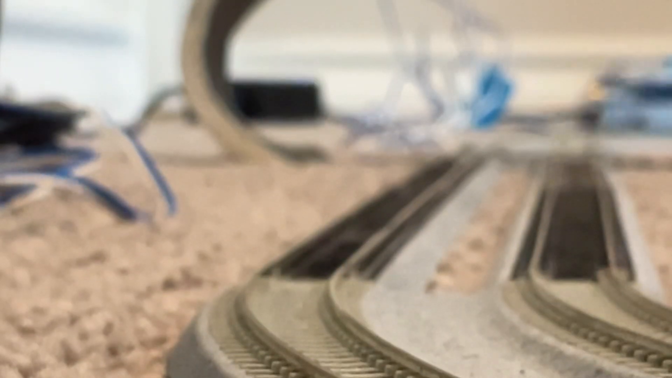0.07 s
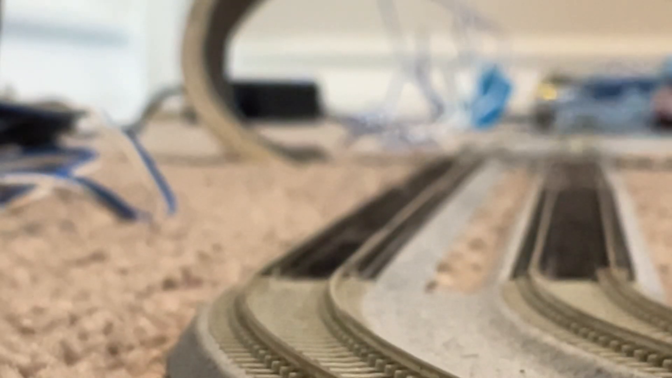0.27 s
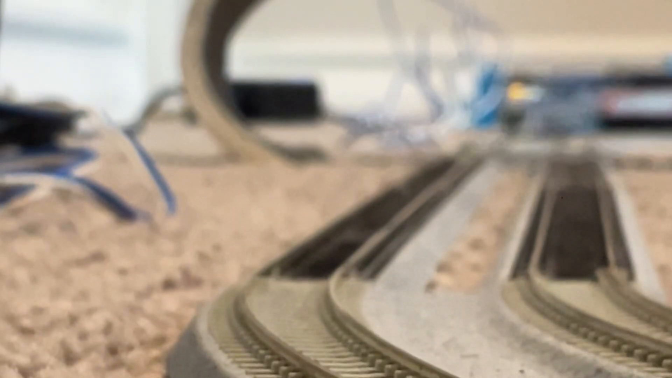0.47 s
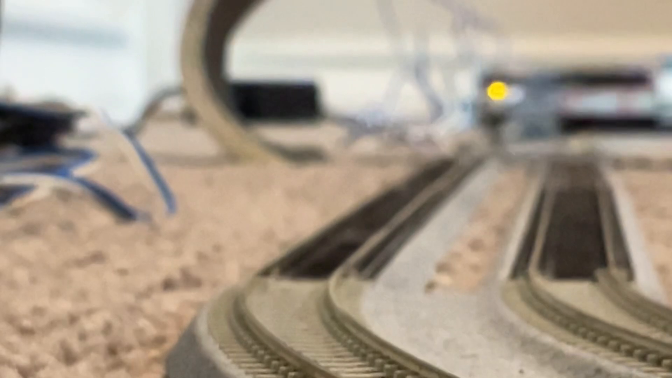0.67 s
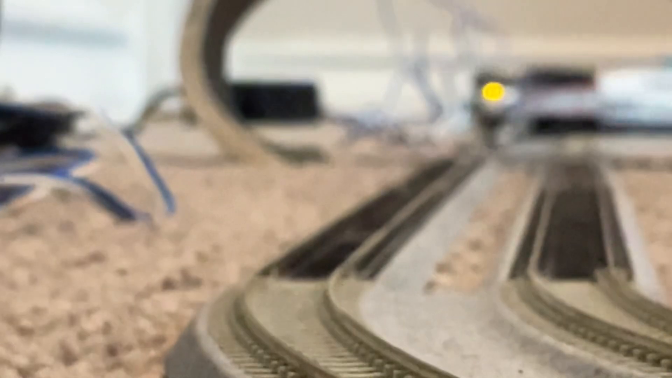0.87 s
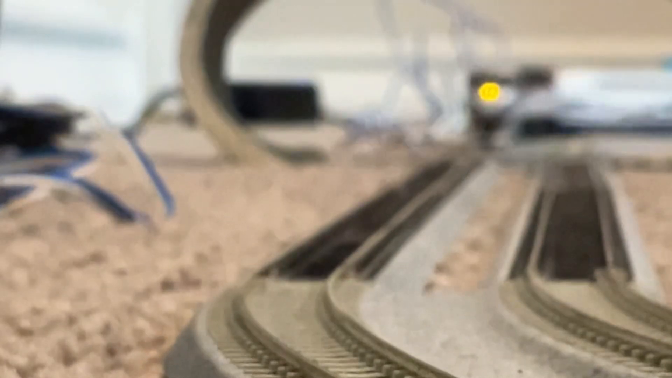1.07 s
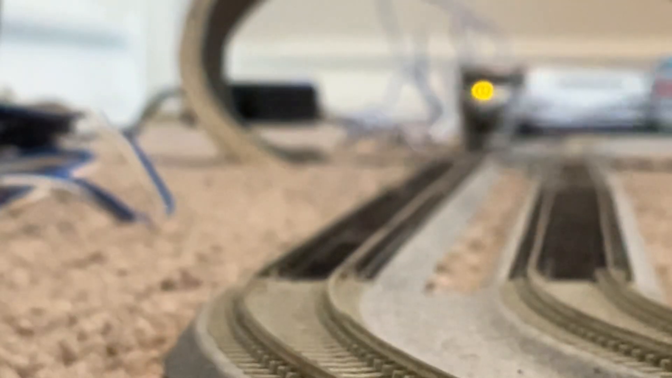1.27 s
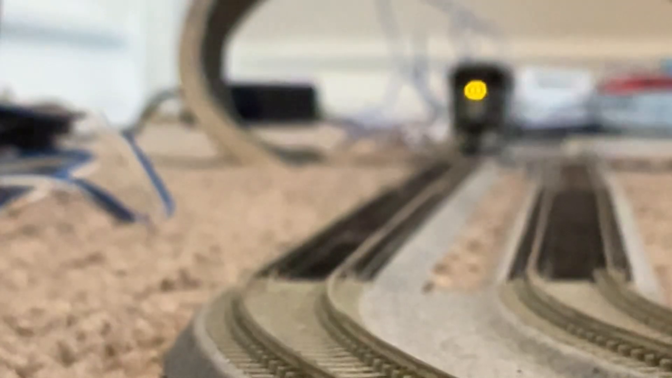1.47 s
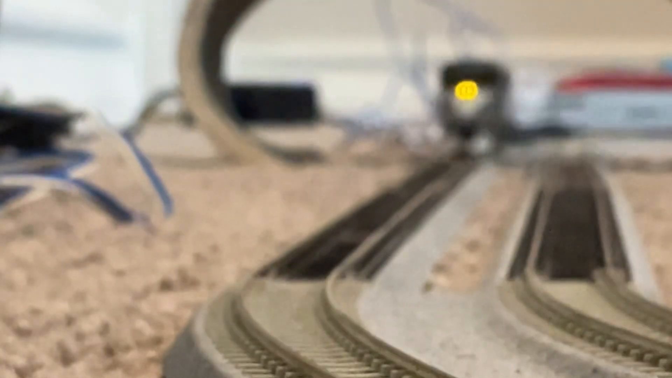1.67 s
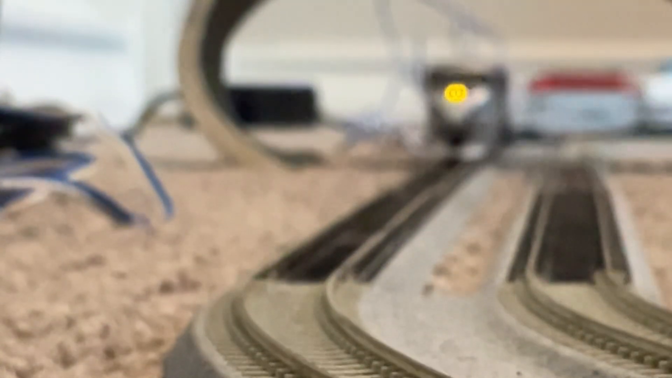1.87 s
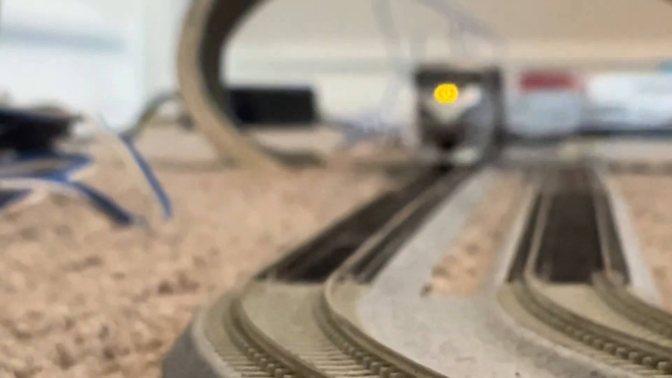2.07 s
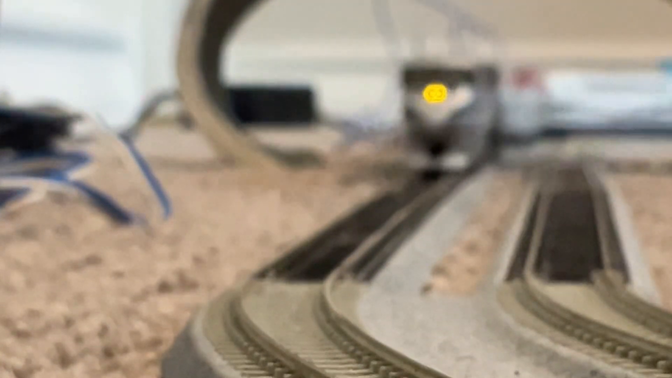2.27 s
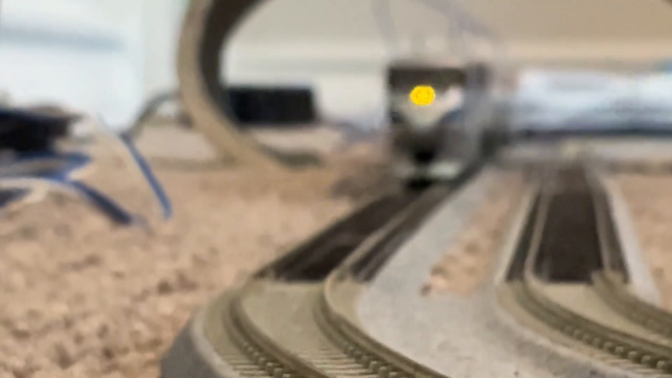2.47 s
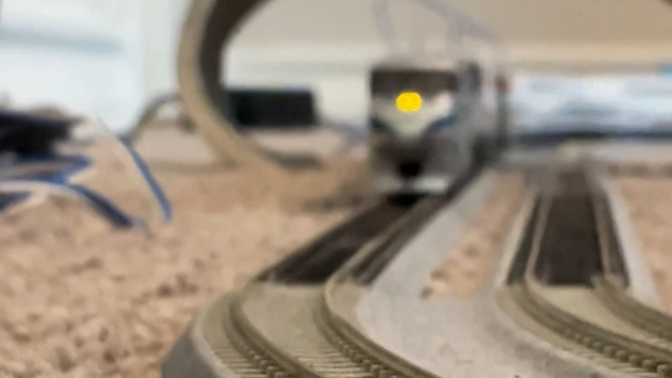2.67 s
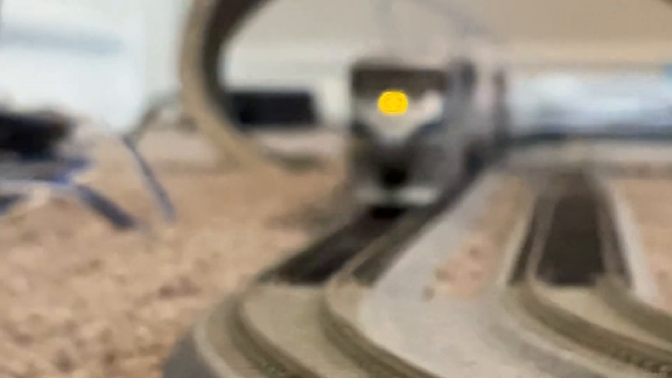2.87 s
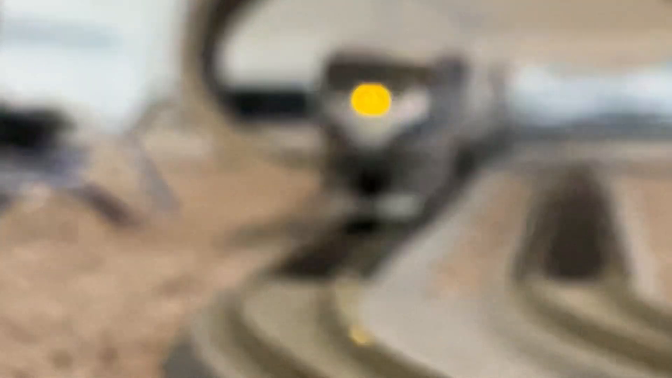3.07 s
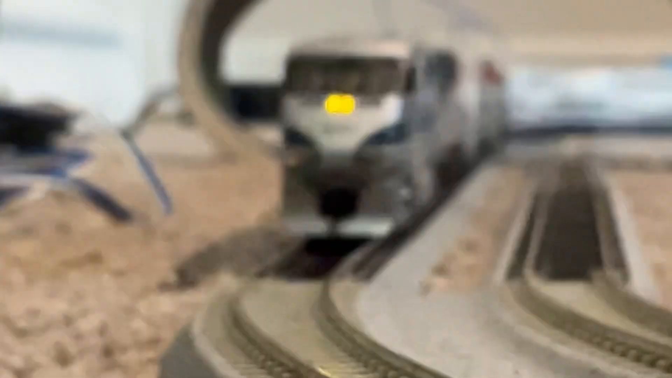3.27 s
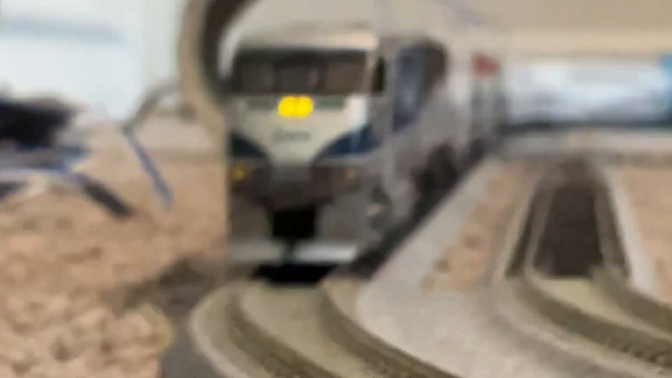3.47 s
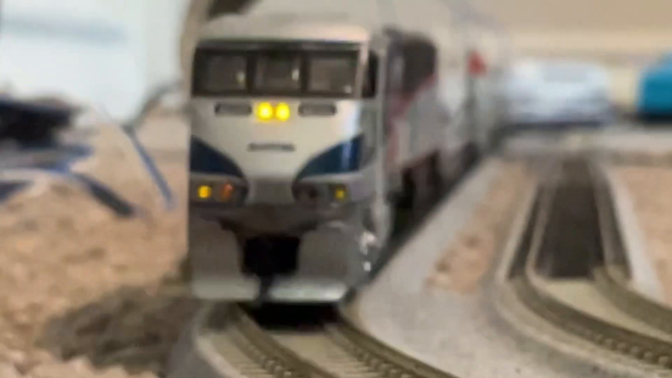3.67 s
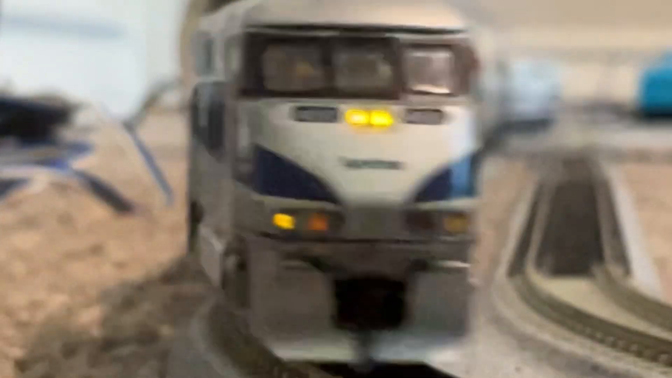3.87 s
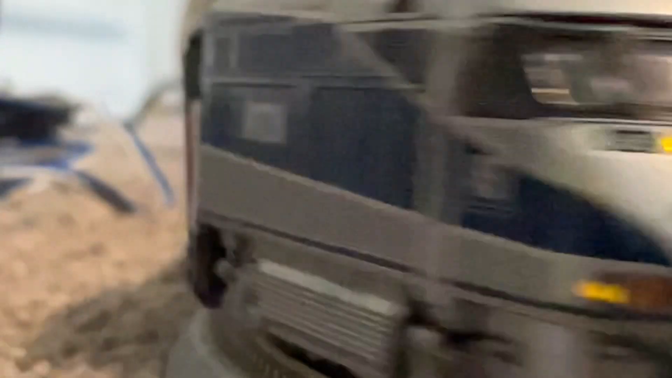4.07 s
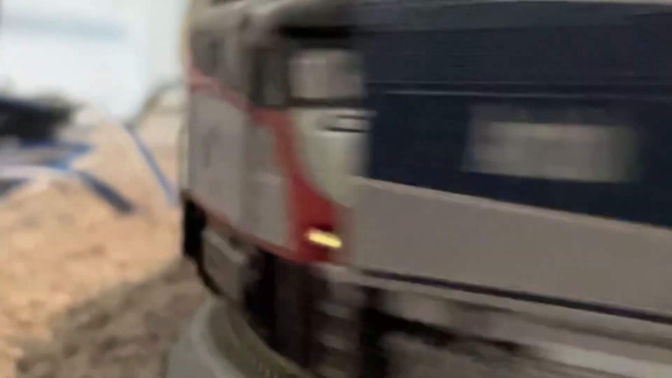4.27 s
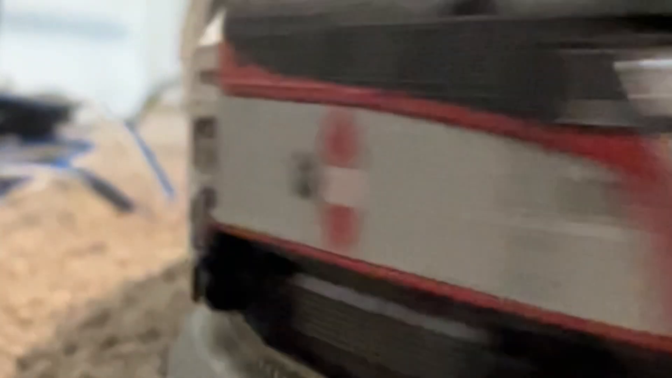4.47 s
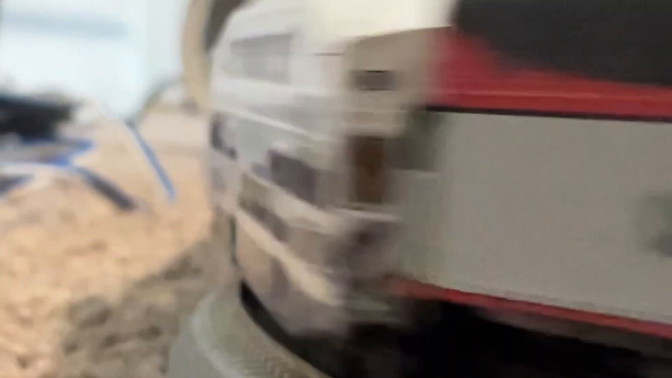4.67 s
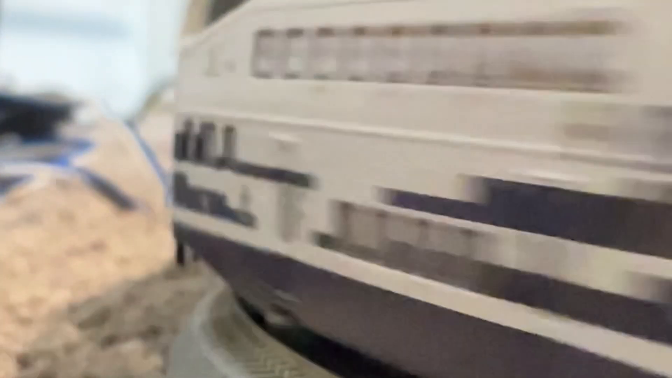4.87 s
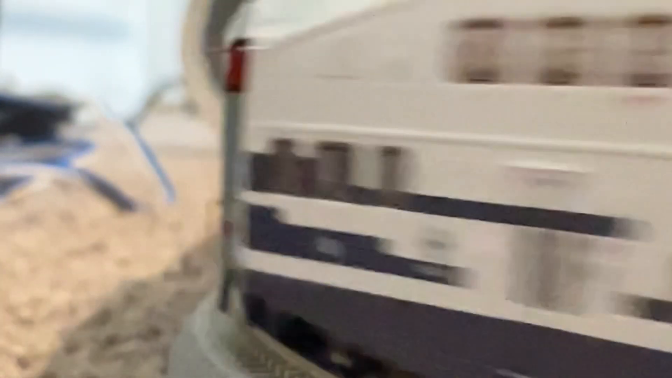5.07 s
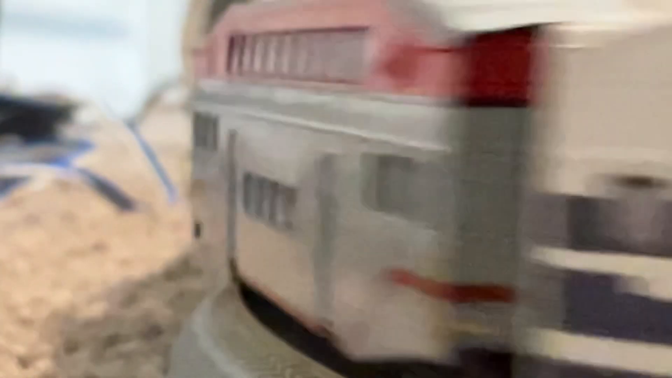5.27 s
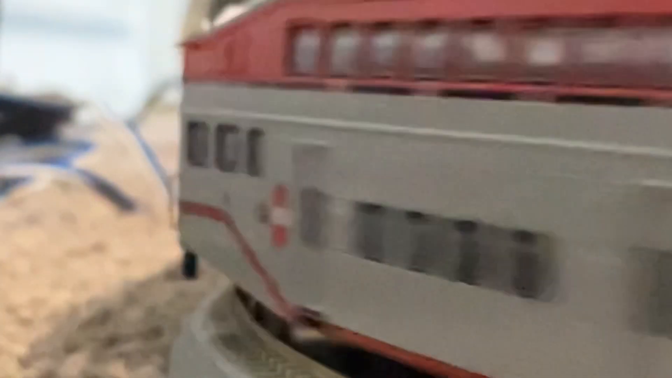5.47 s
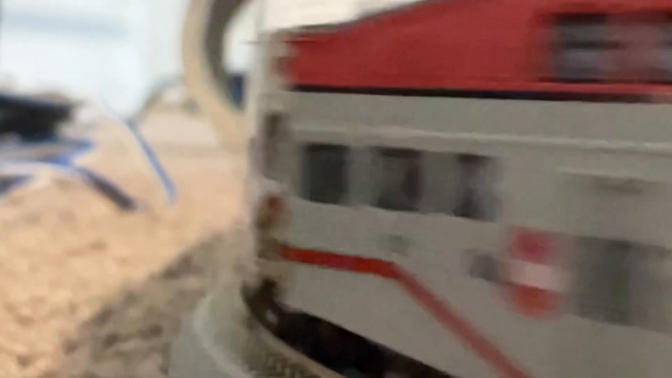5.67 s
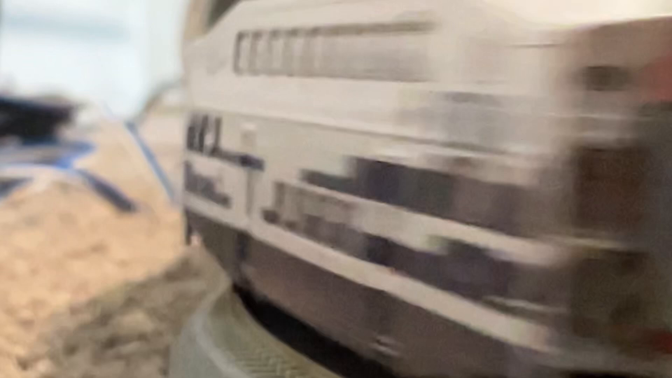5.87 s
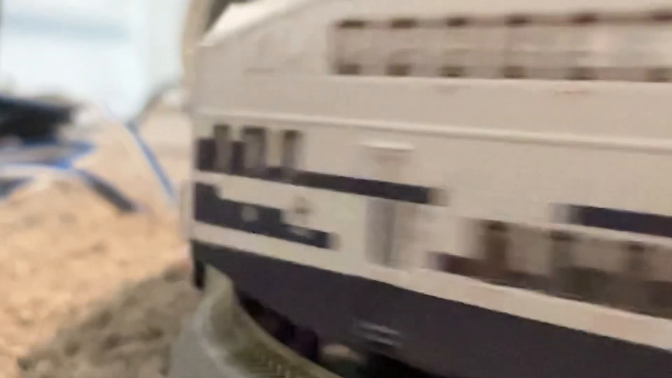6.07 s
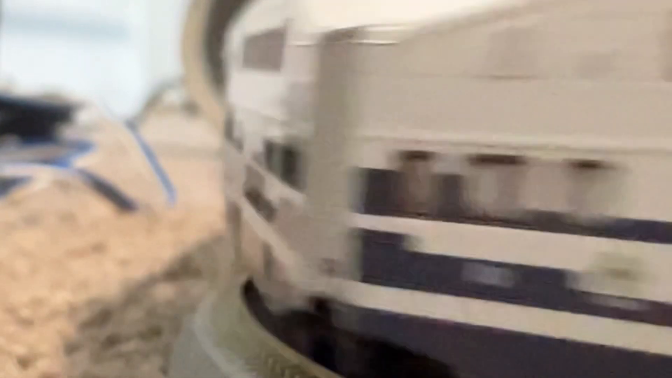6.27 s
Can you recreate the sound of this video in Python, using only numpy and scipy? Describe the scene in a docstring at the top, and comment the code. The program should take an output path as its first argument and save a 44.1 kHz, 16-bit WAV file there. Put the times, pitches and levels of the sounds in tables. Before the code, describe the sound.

A small electric model train whirs closer and rolls past, its motors whining and metal wheels hissing and clicking over rail joints.

```python
"""A tabletop indoors: a small electric model train comes round the track, runs up close and rolls past,
two locomotives and then the coaches. Motor and gears whine, brushes fizz, and the plastic shells, track
bed and table hum. Metal wheels hiss on the rails and click over the joints, above the low hum of the house.
The stereo image is widened by a fixed left-right phase turn at each pitch."""
import sys
import numpy as np
from scipy import signal
from scipy.fft import rfft, irfft, next_fast_len
from scipy.io import wavfile
from scipy.ndimage import uniform_filter1d

SR = 44100
rng = np.random.default_rng(int(sys.argv[2]) if len(sys.argv) > 2 else 0)


def put_to_file(sound):
    """Save the sound as 16-bit audio at rate SR, in the file named by the first command-line argument."""
    columns = np.atleast_2d(sound).T  # one column per channel
    safe = np.clip(columns, -1, 1)
    whole_steps = np.round(safe * 32767)
    wavfile.write(sys.argv[1], SR, whole_steps.astype(np.int16))


N = 278712


def amp(db):
    return 10 ** (np.asarray(db) / 20)


def unit(x):
    return x / np.sqrt(np.mean(x ** 2) + 1e-20)


def along(points, hz):
    """Read (freq_hz, value) points on a log frequency axis."""
    freqs, values = np.transpose(points)
    return np.interp(np.log(hz + 1), np.log(freqs + 1), values)


def curves(rows):
    """One automation curve for each column after the time."""
    times, *columns = np.transpose(rows)
    return [np.interp(np.arange(N) / SR, times, column) for column in columns]


def wobble(rate):
    """A smooth random curve, rate knots a second."""
    knots = rng.standard_normal(int(N * rate / SR) + 2)
    at = np.arange(N) * (rate / SR)
    k = at.astype(int)
    ease = (at - k) ** 2 * (3 - 2 * (at - k))
    return knots[k] + ease * (knots[k + 1] - knots[k])


def filtered(x, response):
    """Equalise x with a gain that is a function of frequency."""
    size = next_fast_len(N + SR // 4)
    return irfft(rfft(x, size) * response(np.fft.rfftfreq(size, 1 / SR)), size)[..., :N]


def rush(spectrum, patchy_db, grit_db):
    """Coloured noise of rms 1 with patches of random gain, roughened by uneven contact grit."""
    gritty = rng.standard_normal(N) * amp(grit_db * wobble(900))
    frames = signal.stft(gritty, nperseg=512)[2]
    patches = uniform_filter1d(rng.standard_normal(frames.shape), size=8, axis=0)
    patches = uniform_filter1d(patches, size=10, axis=1)
    noise = signal.istft(frames * amp(patchy_db * unit(patches)), nperseg=512)[1][:N]
    return unit(filtered(noise, lambda hz: amp(along(spectrum, hz))))


def blend(share, first, second):
    """The two halves of an equal-power crossfade; share goes to the second."""
    share = np.clip(share, 0, 1)
    return np.sqrt(1 - share) * first, np.sqrt(share) * second


def turning(pitch_hz, unsteady):
    """Phase of a tone from a shaft whose speed hunts a little."""
    return 2 * np.pi * np.cumsum(pitch_hz * (1 + unsteady * wobble(25))) / SR


def orders(phase, partials, flutter_db, pace):
    """Partials of a shaft tone, each fluttering on its own."""
    return sum(np.sqrt(2) * amp(db + flutter_db * wobble(pace))
               * np.sin(multiple * phase + rng.uniform(0, 2 * np.pi)) for multiple, db in partials)


def passing(layer):
    """A layer's pass-by level in dB: far train, each locomotive, then the coaches, added in power."""
    # mix by layer: far_db, swell_db_per_s, first_loco_db, second_loco_db, coaches_db,
    # steepness of the loss with distance, first_loco_lag_s
    layers = {"table": (-53, 2, -55, -48.5, -48.5, 0.5, -0.1),
              "bed": (-56.5, -1.2, -58, -45.5, -50, 0.7, -1.5),
              "shell": (-52.5, 0, -47.5, -36, -42, 1.1, -0.16),
              "wheel": (-47.5, -0.8, -37.5, -30.5, -34, 1.23, 0),
              "low": (-59.5, 0.6, -54.5, -58, -62.5, 0.8, 0.2),
              "middle": (-61.5, -2, -57.5, -50, -58, 1.3, .2), "upper": (-58, -2.3, -63, -66, -50.5, 7, 2),
              "high": (-66.5, 2.5, -56.5, -42.5, -59, 2, -0.1)}
    # the two locomotives going by: abreast_s, half_pass_s, fade_in_s, fade_out_s
    locomotives = [(3.72, 0.18, 0.07, .2), (4.48, 0.13, .14, 0.1)]
    far_db, swell, first_db, second_db, coaches_db, steepness, lag_s = layers[layer]
    coaches_s, rise_s = 4.41, 0.13
    t = np.arange(N) / SR
    arrived = 1 / (1 + np.exp((coaches_s - t) / rise_s))
    power = (1 - arrived) * amp(far_db + swell * t) ** 2 + arrived * amp(coaches_db) ** 2
    for loco, db, late_s in zip(locomotives, (first_db, second_db), (lag_s, 0)):
        abreast_s, half_s, fade_in_s, fade_out_s = loco
        since = t - abreast_s - late_s
        away = np.maximum(-since - half_s, 0) / fade_in_s + np.maximum(since - half_s, 0) / fade_out_s
        power += amp(db) ** 2 / (1 + away ** 2) ** steepness
    return 10 * np.log10(power)


def motor_whine():
    """The motor's poles sing in four groups of partials; returns the whine and the pole phase."""
    # motor speed and waver: time_s, pitch_hz, waver_db
    running = [(0, 452.2, 1), (.9, 451.6, 0), (1.5, 461.5, -4), (1.65, 459.4, 4.5), (2, 455.3, 0.5),
               (2.4, 453, -7), (2.75, 458.6, 2), (3.1, 455.6, 1), (3.45, 458, 2.5), (3.75, 453.8, -2.5),
               (4.1, 453.4, 4), (4.6, 455, 1), (4.78, 451, -5.5), (5, 453.3, 1.5), (5.45, 448.3, 3),
               (5.8, 447.3, -1.5), (6.32, 448.4, 1.5)]
    # partials of the pole pitch, by group: multiple, level_db
    low = [(.5, -8.5), (1, -0.5), (1.5, -15), (2, -12)]
    middle = [(2.5, -3.5)]
    upper = [(3, -4)]
    high = [(3.5, -12.5), (4, -0.5), (4.5, -11)]
    pole_hz, waver_db = curves(running)
    phase = turning(pole_hz, unsteady=0.0046)
    whine = amp(passing("low")) * orders(phase, low, flutter_db=3, pace=17)
    whine += amp(passing("middle")) * orders(phase, middle, flutter_db=3, pace=22)
    whine += amp(passing("upper")) * orders(phase, upper, flutter_db=3.5, pace=22)
    whine += amp(passing("high")) * orders(phase, high, flutter_db=4, pace=22)
    return amp(waver_db) * whine, phase


def gear_whine():
    """Meshing gears give a tone that throbs with their uneven teeth."""
    # gear tone fader: time_s, level_db
    fader = [(0, -60), (.85, -49.5), (1.25, -58), (1.7, -50), (2.05, -65), (2.2, -49.5), (2.7, -50),
             (3.3, -49), (3.6, -67), (4, -44.5), (4.35, -49), (4.6, -71), (6.32, -68)]
    # partials of the mesh pitch: multiple, level_db
    partials = [(1, -3), (2, -18.5)]
    level_db, = curves(fader)
    phase = turning(pitch_hz=320.6, unsteady=0.0077)
    return amp(level_db) * orders(phase, partials, flutter_db=2, pace=40)


def wheel_hiss(closeness, judder):
    """Metal rolls on metal; returns the far hiss of the rails and the close hiss of the wheels."""
    # colour of the rails and of the wheels: freq_hz, level_db
    rail_colour = [(1500, -30), (2100, -23), (2350, -3.5), (2650, -3), (2950, 0), (3400, -2), (4100, -4),
                   (5000, 1), (5900, -7.5), (7000, -5), (8500, -3), (10000, -8.5), (13000, -7.5),
                   (16000, -12.5)]
    wheel_colour = [(40, -42), (200, -19), (1200, -18), (1800, -2.5), (2150, -2.5), (2350, -2), (2650, -2),
                    (2970, 1), (3250, -0.5), (4200, 1.5), (5500, 0.5), (7500, 3.5), (8700, 2), (10500, -5),
                    (13500, -16), (16000, -18)]
    rails = rush(rail_colour, patchy_db=1.1, grit_db=-1.0)
    wheels = rush(wheel_colour, patchy_db=1.26, grit_db=1.5)
    gain = amp(passing("wheel") + 0.5 * judder)
    return blend(closeness, gain * rails, gain * wheels)


def joint_knocks():
    """Wheels on rail joints knock track and table; bending waves bring the treble before the bass."""
    # knocks: start_s, ring_db, thud_db, tilt_db_per_octave
    knocks = [(0.608, -50.5, -38, 6), (1.385, -35.5, -46, 5), (2.465, -39, -55, -0.5),
              (3.009, -30.5, -44, 5.5), (3.034, -37, -51, 1), (3.062, -37, -53, -3), (4.292, -31, -62, -4),
              (4.537, -32, -59, 10), (5.275, -33, -49, 6), (5.7, -42, -44, -5), (6.103, -38, -56, 8)]
    # track resonances: pitch_hz, level_db, t60_s
    track_modes = [(287, -3, 0.016), (500, -7, 0.0099), (805, -0.5, 0.0097), (1290, 9, 0.0048),
                   (1755, 1, 0.005), (2220, 3.5, 0.004)]
    out, t = np.zeros(N + SR), np.arange(SR // 8) / SR
    hz, mode_db, t60_s = np.transpose(track_modes)[:, :, None]
    delay_s = 0.0029 * (np.sqrt(1000 / hz) - 0.66)
    since = np.maximum(t - delay_s, 0)
    attack = 1 - np.exp(-since * hz * 3)
    modes = amp(mode_db - 60 * since / t60_s) * np.sin(2 * np.pi * hz * since) * attack
    thud = amp(-60 * t / 0.1) * np.sin(2 * np.pi * 68 * t) * (1 - np.exp(-t / 0.0086))
    for start_s, ring_db, thud_db, tilt in knocks:
        strengths = amp(ring_db + tilt * np.log2(hz / 1000) + rng.normal(0, 0.42, hz.shape))
        out[round(start_s * SR):][:len(t)] += (strengths * modes).sum(axis=0) + amp(thud_db) * thud
    return out[:N]


def wheel_ticks():
    """Short bursts of metal hiss as close wheels jolt over joints and points."""
    # jolts: start_s, level_db
    jolts = [(3.6194, -31), (3.68, -41), (3.742, -27), (3.7817, -27), (4.0495, -26), (4.1088, -24.5),
             (4.3575, -24), (4.3737, -21.5), (4.4034, -24)]
    # colour of a jolt: freq_hz, level_db
    colour = [(2000, -40), (3500, 1), (7500, 1), (11000, 2), (13500, -23), (16000, -22)]
    attack_s, t60_s = 0.0044, 0.067
    envelope, t = np.zeros(N + SR), np.arange(SR // 10) / SR
    burst = amp(-60 * t / t60_s) * (1 - np.exp(-t / attack_s))
    for start_s, level_db in jolts:
        envelope[round(start_s * SR):][:len(t)] += amp(level_db) * burst
    hiss = unit(filtered(rng.standard_normal(N), lambda hz: amp(along(colour, hz))))
    return envelope[:N] * hiss


def brush_fizz(judder, rotation):
    """Brushes rub in the spinning motor: a bright fizz that pulses with each turn."""
    # fizz fader: time_s, level_db
    fader = [(0, -53.5), (.4, -49), (.95, -52), (1.18, -45.5), (1.4, -47), (1.9, -50.5), (2.9, -45),
             (3.45, -43), (3.78, -36), (4, -38.5), (4.2, -36), (4.36, -31), (4.64, -33.5), (4.8, -36),
             (5.16, -45), (5.44, -41), (5.7, -45.5), (6.32, -42)]
    # colour of the brushes: freq_hz, level_db
    colour = [(40, -20), (200, -8.5), (6000, -7), (8000, -7), (9000, -0.5), (10000, 3), (11000, 1),
              (12600, 1.5), (13300, -6), (14300, -16), (15300, -6), (16000, -14)]
    level_db, = curves(fader)
    gain = amp(level_db + 0.7 * wobble(40) + 0.25 * judder + 0.54 * rotation)
    return gain * rush(colour, patchy_db=1.5, grit_db=2.2)


def shell_hum(judder, rotation):
    """The plastic bodies resonate in the midrange, shaken by wheels and motor."""
    # colour of the coach and locomotive shells: freq_hz, level_db
    coach_colour = [(700, -33), (850, -17), (1000, -9), (1200, -3), (1350, -1), (1450, 1), (1560, 2.5),
                    (1720, -1), (2000, -15.5), (2300, -2.5), (2600, -103)]
    loco_colour = [(900, -40), (1200, -40), (1380, -11), (1540, 6.5), (1700, -4), (1830, 3), (2000, 7),
                   (2070, 3.5), (2140, 0.5), (2500, -24)]
    # crossfade from coach to locomotive shells: time_s, loco_share
    crossfade = [(0, 0.06), (1.4, 0.04), (3, 0.3), (3.9, 0.33), (4.3, 0.85), (4.65, .9), (5, 0.21),
                 (6.32, 0.07)]
    loco_share, = curves(crossfade)
    coaches = rush(coach_colour, patchy_db=2.0, grit_db=1.0)
    locomotive = rush(loco_colour, patchy_db=0.7, grit_db=1.5)
    gain = amp(passing("shell") + 0.34 * judder + 0.58 * rotation)
    return gain * sum(blend(loco_share, coaches, locomotive))


def track_bed_hum():
    """The track bed gives a hollow rush under the rolling wheels."""
    # colour of the track bed: freq_hz, level_db
    colour = [(330, -19), (480, -5.5), (660, 0), (800, -7.5), (950, -1), (1100, -2), (1400, -20)]
    gain = amp(passing("bed") + 0.64 * wobble(5) + 0.24 * wobble(25))
    return gain * rush(colour, patchy_db=1.5, grit_db=1.8)


def table_hum():
    """The tabletop is a sounding board for the train, humming in the low mids."""
    # colour of the tabletop: freq_hz, level_db
    colour = [(60, -47), (120, -16), (200, -7.5), (270, -4), (330, 0.5), (410, -4.5), (520, -9),
              (620, -17.5), (800, -25.5)]
    gain = amp(passing("table") + 0.66 * wobble(14) + 1.3 * wobble(36))
    return gain * rush(colour, patchy_db=1.4, grit_db=0.5)


def room_tone():
    """The low hum of the house."""
    # colour of the room: freq_hz, level_db
    colour = [(25, -26), (40, -7), (60, 5), (90, -5.5), (140, 1), (220, -7), (400, -39)]
    return amp(-64) * rush(colour, patchy_db=1.5, grit_db=2.5)


def scattered(x):
    """The same sound after many ever-changing reflections: same level and colour, new phases."""
    frames = signal.stft(x, nperseg=1024)[2]
    shuffled = frames * np.exp(2j * np.pi * rng.random(frames.shape))
    return np.std(x) * unit(signal.istft(shuffled, nperseg=1024)[1][:N])


def stereo_spread(x, pan, diffuse=None, loose_rad=0):
    """Widen by a fixed phase turn at each pitch; diffuse and loose_rad put reflections in the side."""
    # phase by which right leads left: freq_hz, half_turns
    phase_lead = [(0, 0), (600, 0), (1250, .4), (1700, 0), (1940, -.36), (2200, -.66), (2330, -.8),
                  (2390, -.97), (2440, -.996), (2640, -.998), (2660, -1), (2860, -1), (2950, -1.03),
                  (3030, -1.08), (3100, -1.2), (3450, -1.54), (3800, -1.76), (4130, -1.84), (4480, -1.76),
                  (4820, -1.57), (5020, -1.2), (5075, -1.02), (5170, -.68), (5500, -.4), (5860, -.25),
                  (6300, -.1), (6550, -.18), (6900, -.39), (7300, -.53), (8270, -.35), (8640, -.25),
                  (8760, -.93), (8860, -1), (8920, -1), (9050, -.93), (9300, -.68), (9650, -.33),
                  (9800, -.08), (10400, 0), (11600, 0), (11900, -.1), (13100, -.1), (13300, 0),
                  (14400, -.02), (15500, -.15)]
    # how much of the pan and diffuse curves applies: freq_hz, share
    width_curve = [(2000, 1), (2350, 0)]
    size = next_fast_len(N + SR // 4)
    hz = np.fft.rfftfreq(size, 1 / SR)
    half_lead = np.pi / 2 * np.interp(hz, *np.transpose(phase_lead))
    direct, width, wet = rfft(x, size), along(width_curve, hz), 0
    mid = np.cos(half_lead) * direct
    side = -1j * np.sin(half_lead) * np.cos(loose_rad) * direct
    if diffuse:
        wet = np.clip(along(diffuse, hz), 0, 1) * width
        side += np.hypot(np.sin(half_lead) * np.sin(loose_rad), wet) * rfft(scattered(x), size)
    signs = np.array([[1], [-1]])
    gains = amp(along(pan, hz) * width * signs / 2) / np.hypot(1, wet)
    return irfft((mid + signs * side) * gains, size)[:, :N]


def scene():
    """Mix four stereo buses: far sound through table and room, close sound, knocks and tones."""
    # how much is heard straight from the train: time_s, direct_share
    approach = [(0, .01), (3.7, .08), (4.05, 0.54), (4.3, 0.91), (6.32, 0.97)]
    # pan of each bus: freq_hz, left_minus_right_db
    far_pan = [(60, -1.5), (330, -1.5), (650, 4), (850, 7), (1050, -6), (1300, -9), (1700, -3), (2200, -3)]
    near_pan = [(60, 3), (380, 5), (520, -12.5), (680, -9.5), (850, -2.5), (1250, -4.5), (1700, -4.5),
                (2200, 1.5)]
    knock_pan = [(60, -3), (500, 12), (750, -12), (1100, -10), (1700, -6), (2200, -7)]
    tone_pan = [(200, -3), (330, 0.5), (460, 0.5), (900, -2), (1360, -6.5), (1820, -2), (2200, -14)]
    # reflections on the far and close buses: freq_hz, scattered_gain
    far_diffuse = [(40, .2), (120, 0.38), (330, 0.27), (700, 0.52), (1200, 0.94), (1600, 0.87), (2000, 0),
                   (2300, 0.19)]
    near_diffuse = [(40, 0.2), (120, 0.0075), (330, 0.39), (500, 0.5), (800, 0.5), (1200, 0.88),
                    (1500, 0.48), (2000, 0.39), (2300, 0.073)]
    closeness, = curves(approach)
    motor, pole_phase = motor_whine()
    tones = motor + gear_whine()
    rotation = np.cos(pole_phase / 2)  # once a motor turn
    judder = wobble(32) + 0.31 * wobble(70)  # wheels rocking on the rails shake all the treble at once
    table = table_hum()
    body = track_bed_hum() + shell_hum(judder, rotation)
    body_far, body_near = blend(closeness, body, body)
    rails, wheels = wheel_hiss(closeness, judder)
    brushes = brush_fizz(judder, rotation)
    far = table + rails + body_far + room_tone()
    mix = stereo_spread(joint_knocks(), knock_pan) + stereo_spread(tones, tone_pan)
    mix += stereo_spread(far, far_pan, far_diffuse, loose_rad=0.47)
    near = wheels + brushes + body_near + wheel_ticks()
    return mix + stereo_spread(near, near_pan, near_diffuse, loose_rad=0.7)


def record(dry):
    """The microphone rolls off the deepest bass; the recorder keeps nothing above its band limit."""
    low_cut_hz, top_hz = 44, 15780
    return filtered(dry, lambda hz: (hz < top_hz) * hz ** 4 / (hz ** 4 + low_cut_hz ** 4))


dry = scene()
out = record(dry)
put_to_file(out)
```